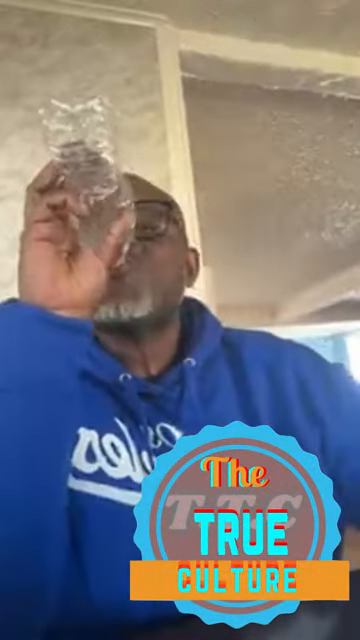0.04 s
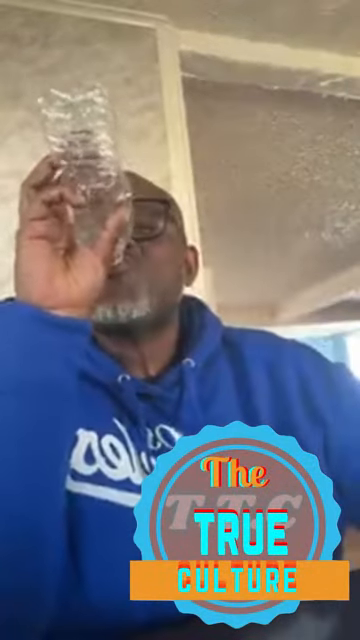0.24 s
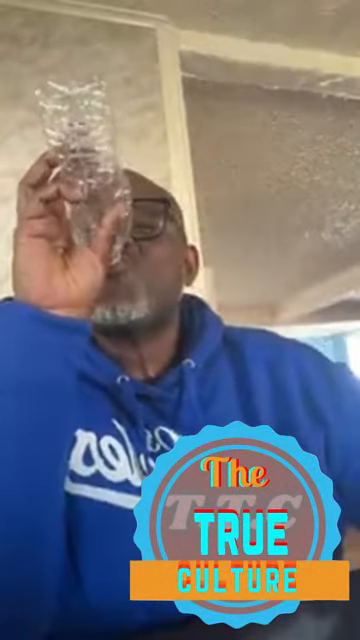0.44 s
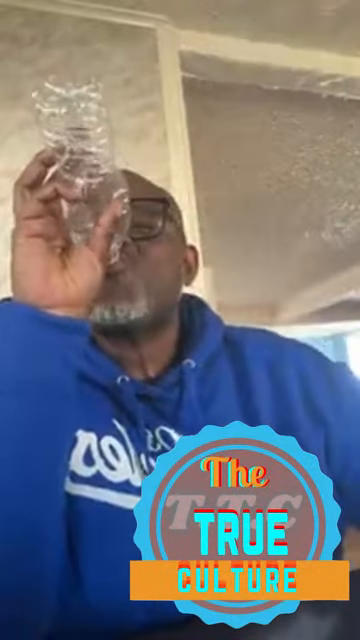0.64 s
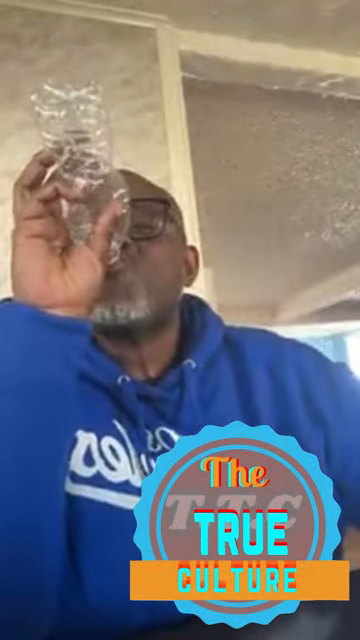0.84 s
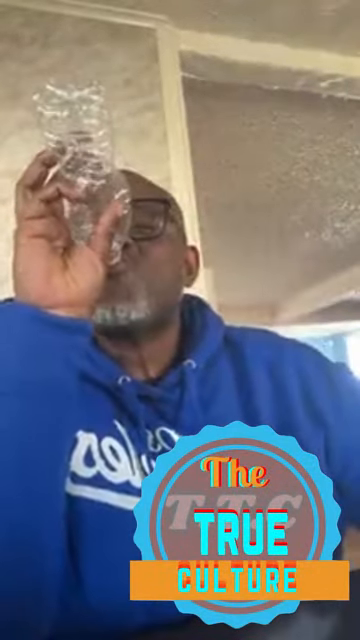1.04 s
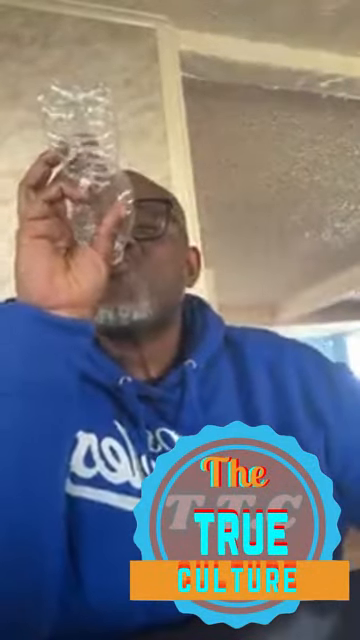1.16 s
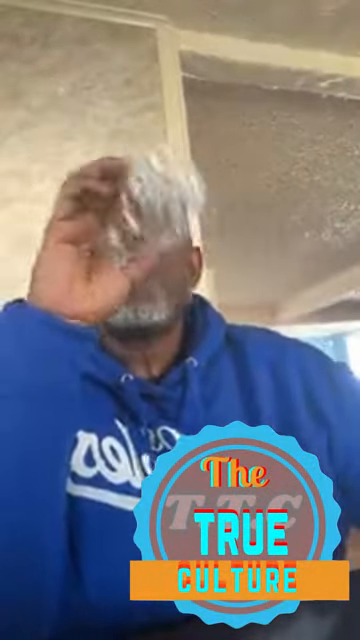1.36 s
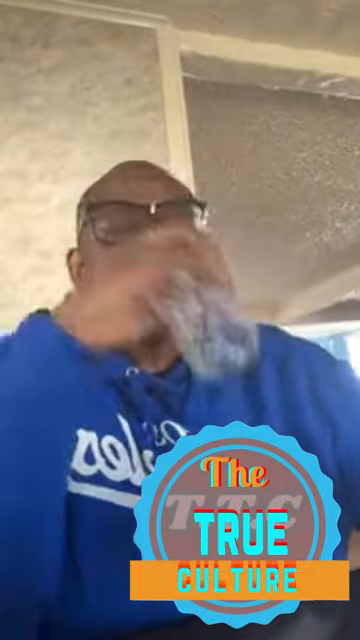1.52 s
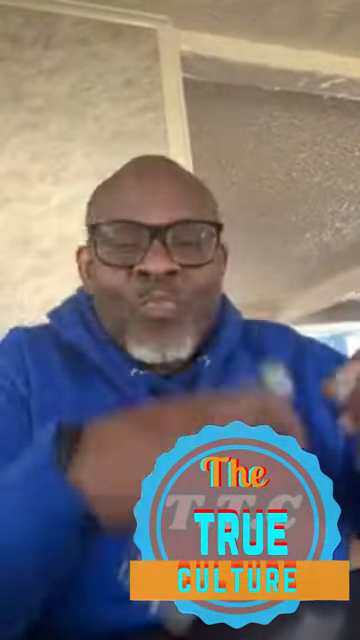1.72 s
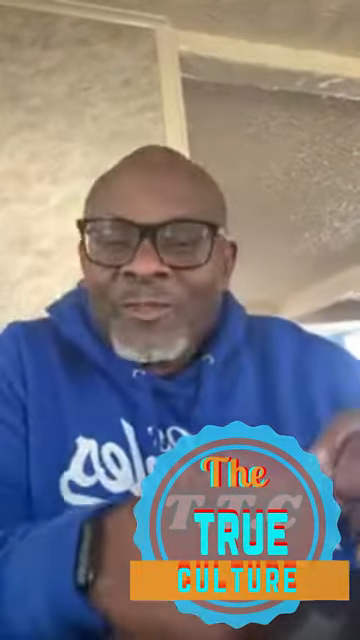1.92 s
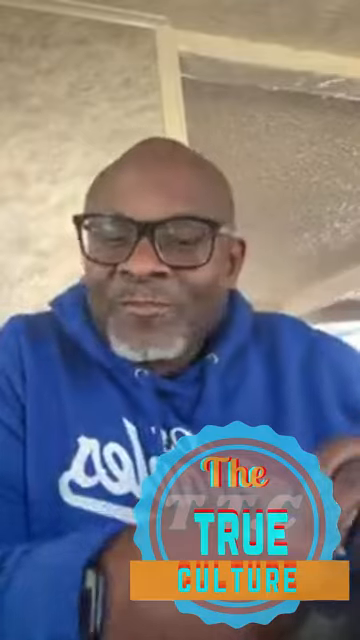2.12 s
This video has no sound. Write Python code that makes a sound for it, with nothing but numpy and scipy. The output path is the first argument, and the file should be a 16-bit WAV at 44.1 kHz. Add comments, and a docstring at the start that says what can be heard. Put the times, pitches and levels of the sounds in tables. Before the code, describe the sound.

A thin plastic bottle crackles and snaps close by as someone drinks, with soft thumps and two faint gurgles. The lips come away wetly, the bottle hums once, and more snaps follow with a sleeve rustle in a small room.

```python
"""Someone drains a thin plastic bottle in a small room, then lowers it.
Over the hush of the room, creases tick and the bottle thumps softly in the hand. Panels of its wall
buckle with sharp snaps that ring in the shell and bounce along the air inside. Water gurgles twice,
the lips leave the bottle with wet pings, and the air in it hums once. A sleeve rustles as the arm
comes down, among more snaps and ticks."""
import sys
import numpy as np
from scipy import signal
from scipy.fft import rfft, irfft, next_fast_len
from scipy.io import wavfile

SR = 44100
rng = np.random.default_rng(int(sys.argv[2]) if len(sys.argv) > 2 else 0)


def persist_wave(psi):
    """Save psi, clipped to +-1, as 16-bit WAV."""
    counts = np.round(np.clip(psi, -1, 1) * 32767).astype(np.int16)
    wavfile.write(sys.argv[1], SR, np.atleast_2d(counts).T)


N = 96314
TIME = np.arange(N) / SR


def from_db(db):
    """Turn decibels into a factor to multiply a sound by."""
    return 10 ** (np.asarray(db) / 20)


def unit(x):
    """Scale a sound to an energy of one."""
    return x / np.sqrt(np.sum(x ** 2) + 1e-20)


def at_hz(points, hz):
    """Read between the rows of a (frequency, value) table, with octaves evenly spaced."""
    frequencies, values = np.transpose(points)
    return np.interp(np.log(np.maximum(hz, 1)), np.log(frequencies), values)


def cut(x, hz, kind, order=2):
    """Keep the "low" side, the "high" side or a "band"; a higher order cuts more steeply."""
    return signal.sosfilt(signal.butter(order, np.clip(hz, 10, .45 * SR), kind, fs=SR, output="sos"), x)


def click(size=4096):
    """The shortest possible tap: one sample, then silence."""
    return signal.unit_impulse(size) + 1e-18


def ring(x, hz, t60):
    """Let x set one pitch ringing; t60 is the seconds it takes to fade by 60 dB."""
    decay, angle = from_db(-60 / (t60 * SR)), 2 * np.pi * hz / SR
    return unit(signal.lfilter([1, 0, -1], [1, -2 * decay * np.cos(angle), decay * decay], x))


def add(track, s, db, sound, window_s=.004):
    """Place a sound of energy one at s seconds; spread over window_s, it would have level db."""
    start = int(s * SR)
    part = sound[:N - start]
    track[start:start + len(part)] += from_db(db) * np.sqrt(window_s * SR) * part


def noise(colour):
    """Noise with an average power of one; colour sets its balance of low and high."""
    size = next_fast_len(N)
    hz = np.arange(size // 2 + 1) * SR / size
    spectrum = rfft(rng.standard_normal(size)) * from_db(at_hz(colour, hz))
    return unit(irfft(spectrum, size)[:N]) * np.sqrt(N)


def bottle(x, dispersion=0.71, shell_t60=0.0053, bounce_share=0.49):
    """The thin wall smears a crack, the shell rings, and the sound bounces along the air inside."""
    # the pitches at which the shell rings: (pitch [Hz], relative level [dB])
    shell = [(860, -8), (1300, 3.5), (1650, -4.5), (2020, -12.5), (2450, -1.5), (2850, -7.5), (3700, -2),
             (4600, -1), (5600, -20.5), (8100, 0)]
    # in a bending wall the treble runs ahead of the bass
    smear = np.tile([-dispersion, 1, 0, 1, -dispersion, 0], (8, 1))
    crack = unit(signal.sosfilt(smear, x))
    strength = abs(rfft(crack))
    ringing = sum(from_db(db) * strength[int(hz * len(x) / SR)] * ring(crack, hz, shell_t60)
                  for hz, db in shell)
    sound = crack + from_db(-9.5) * ringing
    round_trip = int(0.0012485 * SR * rng.uniform(0.83, 1.2))   # along the bottle and back, in samples
    return unit(sum(bounce_share ** k * np.pad(sound, (k * round_trip, 0))[:len(x)] for k in range(3)))


def still_air():
    """The air of the room makes a faint, steady hush."""
    # tone of the hush: (frequency [Hz], relative level [dB])
    colour = [(25, -1.5), (58, 2), (97, -13), (160, -9.5), (384, -15.5), (600, -18), (1050, -19.5),
              (2930, -24), (4260, -25.5), (8180, -37), (10000, -29)]
    return from_db(-62.5) * noise(colour)


def sleeve(crinkles_per_s=110, spread_db=3):
    """Low rumble, cloth rustle and tiny crinkles of the plastic follow the arm."""
    # rumble of sleeve and grip: (time [s], level [dB])
    rumble_levels = [(0, -56.5), (.13, -67.5), (.23, -49.5), (.45, -59.5), (.57, -75), (.9, -60),
                     (1.03, -68.5), (1.15, -68.5), (1.45, -57), (1.62, -45.5), (1.76, -50.5), (1.92, -56),
                     (2.02, -49), (2.18, -49)]
    # tone of the rumble: (frequency [Hz], relative level [dB])
    rumble_colour = [(25, -14), (58, 8), (95, -9.5), (150, 5), (230, -7.5), (340, -0.5), (550, -25.5),
                     (1500, -33)]
    # rustle of the cloth: (time [s], level [dB])
    rustle_levels = [(0, -70.5), (1.15, -76.5), (1.29, -56.5), (1.44, -64), (1.62, -57), (1.75, -49.5),
                     (1.95, -54), (2.18, -70)]
    # tone of the rustle: (frequency [Hz], relative level [dB])
    rustle_colour = [(300, -2), (1000, 4), (4000, -9), (9000, -7)]
    rumble = from_db(np.interp(TIME, *np.transpose(rumble_levels))) * noise(rumble_colour)
    sizes = from_db(spread_db * np.minimum(rng.exponential(1, N), 3)) * rng.choice([-1, 1], N)
    taps = sizes * (rng.random(N) < crinkles_per_s / SR) + 1e-18
    crinkles = bottle(cut(taps, [800, 5500], "band")) * np.sqrt(N)
    movement = from_db(np.interp(TIME, *np.transpose(rustle_levels)))
    return rumble + movement * (noise(rustle_colour) + from_db(-2) * crinkles)


def buckle(hz, ring_db, top_hz, bass_db):
    """A panel flips: it cracks, mainly above its own pitch, and rings briefly."""
    treble = cut(click(), hz, "high", order=3)
    bass = cut(cut(click(), hz, "low"), 120, "high", order=1)
    crack = unit(cut(treble + from_db(bass_db) * bass, top_hz, "low", order=3))
    t60 = 0.0064 * (1400 / hz) ** 0.27   # larger, lower panels ring longer
    ringing = ring(cut(click(), top_hz, "low"), hz, t60)
    return unit(crack + from_db(ring_db) * ringing)


def crease_ticks(ring_db=-4.5, bass_db=-10.5, echo_db=-6.5):
    """Creases in the plastic give way with small ticks."""
    # one tick a row: (time [s], level [dB], pitch [Hz], treble limit [Hz])
    ticks = [(0.09, -52, 2760, 8000), (0.104, -47, 870, 1900), (0.299, -42, 750, 1097),
             (0.312, -31, 1520, 2740), (0.451, -49, 730, 2470), (0.558, -61.5, 450, 700),
             (0.607, -60, 1510, 1450), (1.252, -51.5, 900, 6000), (1.269, -46, 4200, 5200),
             (1.239, -54, 1140, 2590), (1.657, -48, 3000, 5500), (1.672, -32.5, 2280, 5500),
             (1.681, -48, 1852, 5300), (1.710, -34.5, 4380, 9000), (1.774, -35, 890, 2400),
             (1.786, -46.5, 923, 2800), (1.803, -37.5, 1810, 2290), (2.069, -37, 3160, 5740),
             (2.072, -31.5, 2170, 4400), (2.076, -39.5, 1330, 3260), (2.1428, -47, 2580, 3700),
             (2.148, -45, 1970, 2780)]
    return [(s, db, buckle(hz, ring_db, top_hz, bass_db), echo_db) for s, db, hz, top_hz in ticks]


def hand_thumps(octaves_each_side=0.57, echo_db=-10.5):
    """Bottle and hand knock together: each time a dull, dying shudder around one pitch."""
    # soft knocks: (time [s], level [dB], pitch [Hz], time to fade by 60 dB [s])
    thumps = [(0.106, -45, 310, .05), (0.168, -37, 61.5, 0.23), (0.180, -39.5, 316, .05),
              (0.191, -38, 262, 0.03), (0.215, -40.5, 57, .22), (0.32, -32, 232, .1),
              (0.447, -51.5, 257, 0.1), (0.65, -46.5, 180, 0.13), (0.719, -41.5, 103, .08),
              (0.721, -36.5, 325.7, 0.082), (0.822, -41, 167, .18), (1.029, -46.5, 200, 0.23),
              (1.368, -43, 350, 0.041), (1.522, -27, 134, 0.077), (1.774, -37, 325, 0.058),
              (1.821, -27.5, 209, 0.091), (2.075, -33, 330, 0.044)]
    t, width = TIME[:SR // 3], 2 ** octaves_each_side
    events = []
    for s, db, hz, t60 in thumps:
        shudder = rng.standard_normal(len(t)) * from_db(-60 * t / t60)
        events.append((s, db, unit(cut(shudder, [hz / width, hz * width], "band")), echo_db))
    return events


def wall_snaps():
    """Panels of the wall buckle with sharp snaps."""
    # one snap a row; ring, bass and echo are relative levels:
    # (time [s], level [dB], pitch [Hz], ring [dB], treble limit [Hz], bass [dB], echo [dB])
    snaps = [(0.1905, -33, 583, -0.5, 4200, -35, -5.5), (0.3151, -15.5, 662, 2, 2400, -8, -10),
             (0.7175, -13.5, 2900, -10.5, 8850, -12.5, -4.5), (0.8184, -20, 1490, -4.5, 3930, -5.5, -6),
             (0.8197, -22, 872, -4.5, 1610, -7.5, -10.5), (1.4726, -20.5, 863, -3.5, 3800, -3, -10),
             (1.4799, -30.5, 930, -21, 4380, -17, -2), (1.5158, -12.5, 956, -6, 3470, -9, -10),
             (1.5164, -16, 1750, 7.5, 2550, 7, -13.5), (1.5780, -23, 1390, 4, 1870, 4, -8),
             (1.8172, -8.5, 1710, -17, 4700, -26, -9), (1.8192, -13.5, 2700, -19, 8640, -15.5, -2),
             (1.9603, -21.5, 5350, 2.5, 6370, -25, -5.5), (1.988, -26.5, 5620, -14, 6950, -37, -12)]
    return [(s, db, buckle(hz, ring_db, top_hz, bass_db), echo_db)
            for s, db, hz, ring_db, top_hz, bass_db, echo_db in snaps]


def gurgle():
    """Water shifts softly in the neck."""
    # swells of water: (time of the peak [s], half length [s], level [dB])
    gurgles = [(0.644, 0.014, -54), (1.013, 0.035, -54.5)]
    # tone of the water: (frequency [Hz], relative level [dB])
    colour = [(150, -10.5), (400, -6.5), (700, -3), (1100, -15), (2200, -38)]
    swell = sum(from_db(db) * np.exp(-.5 * ((TIME - s) / width) ** 2) for s, width, db in gurgles)
    return swell * noise(colour)


def lip_pings(t60=.011, echo_db=-5.5):
    """The lips leave the mouth of the bottle with wet pings."""
    # one ping a row: (time [s], level [dB], pitch [Hz])
    pings = [(1.346, -34.5, 5340), (1.3479, -41, 6060), (1.347, -41.5, 3100), (1.3634, -34, 3120),
             (1.369, -38, 3740)]
    return [(s, db, ring(cut(click(), hz, "low"), hz, t60), echo_db) for s, db, hz in pings]


def bottle_hum(hz=143.6):
    """The air in the opened bottle springs against the neck and hums once."""
    track = np.zeros(N)
    push = cut(click(size=SR // 2), hz, "low")
    add(track, s=1.52, db=-25, sound=ring(push, hz, t60=0.29))
    return track


def room_echo(x, early_db=4, early_t60=0.036, delay_s=0.0033):
    """The room answers with dense, quick reflections, then a tail that dies band by band."""
    # how long the echo lasts: (frequency [Hz], time to fade by 60 dB [s])
    fade_times = [(150, 1.5), (700, 0.1171), (1400, 0.32), (3700, 0.35), (9000, 0.35)]
    # tone of the echo: (frequency [Hz], relative level [dB])
    colour = [(150, -4), (400, -2.5), (600, 5), (900, 10), (1400, 4.5), (2800, 0), (5000, -2.5), (9000, -2)]
    t, edges_hz = TIME[:SR // 2], 60 * 2 ** np.arange(0, 8, .5)
    hiss = rng.standard_normal((2, len(t)))
    tail = np.zeros(len(t))
    for k, (low, high) in enumerate(zip(edges_hz, edges_hz[1:])):
        hz = np.sqrt(low * high)
        decay = from_db(-60 * t / at_hz(fade_times, hz)) + from_db(early_db - 60 * t / early_t60)
        tail += from_db(at_hz(colour, hz)) * decay * cut(hiss[k % 2], [low, high], "band")
    tail = unit(tail) * np.sqrt(2 * edges_hz[-1] / SR)
    return signal.fftconvolve(x, np.pad(tail, (int(delay_s * SR), 0)))[:N]


def scene():
    """Mix all sources and the echo of the short sounds into one channel."""
    # lists of events: (time [s], level [dB], sound, relative echo level [dB])
    cracks = wall_snaps() + crease_ticks()
    soft_sounds = lip_pings() + hand_thumps()
    direct, to_room = np.zeros(N), np.zeros(N)
    for s, db, sound, _ in cracks:
        add(direct, s, db, bottle(sound))
    for s, db, sound, _ in soft_sounds:
        add(direct, s, db, sound)
    # the room hears the cracks from all sides, which evens out the bottle's ringing
    for s, db, sound, echo_db in cracks + soft_sounds:
        add(to_room, s, db + echo_db, sound)
    return (direct + room_echo(to_room) + bottle_hum() + sleeve() + gurgle() + still_air())[None]


def record(dry, peak_limit=.85, dull_hz=8650, cutoff_hz=11200):
    """Round off the peaks, dull the treble and cut away the very top."""
    rounded = peak_limit * np.tanh(dry / peak_limit)
    dulled = cut(rounded, dull_hz, "low", order=6)
    return signal.sosfilt(signal.cheby2(16, 80, cutoff_hz, fs=SR, output="sos"), dulled)


dry = scene()
out = record(dry)
persist_wave(out)
```